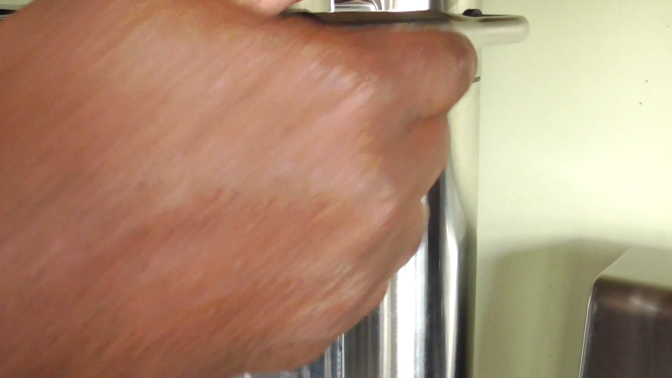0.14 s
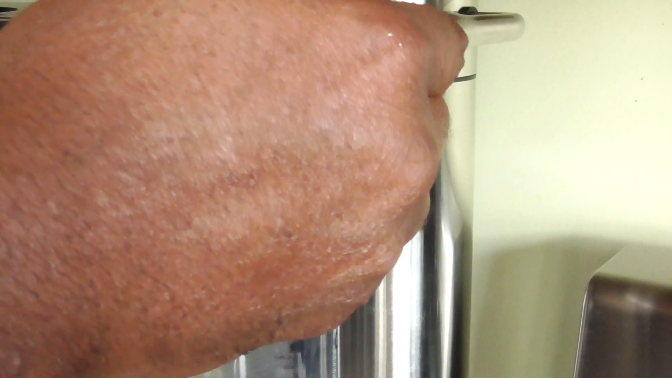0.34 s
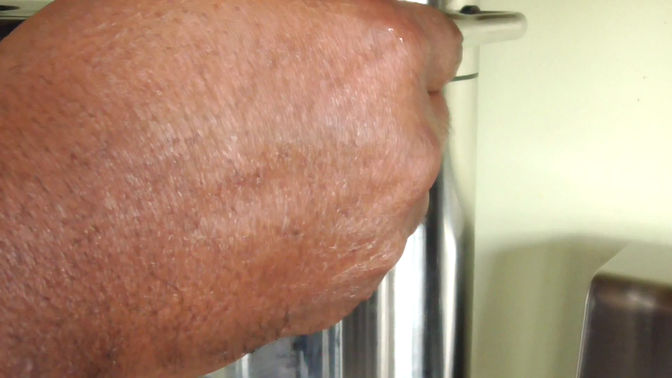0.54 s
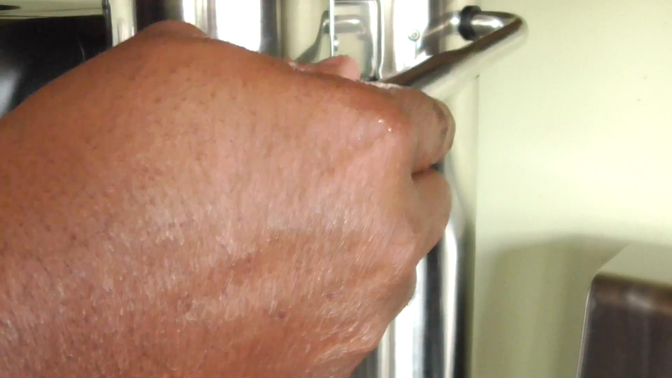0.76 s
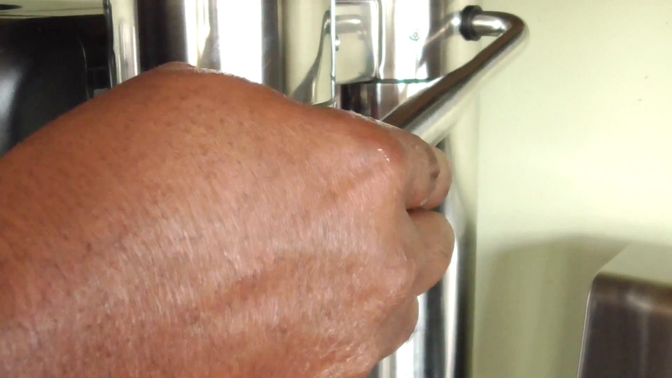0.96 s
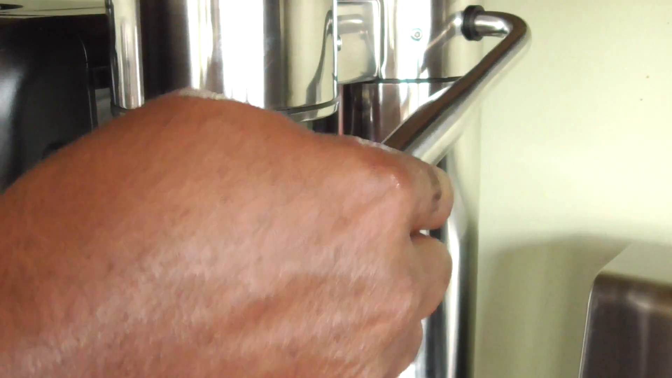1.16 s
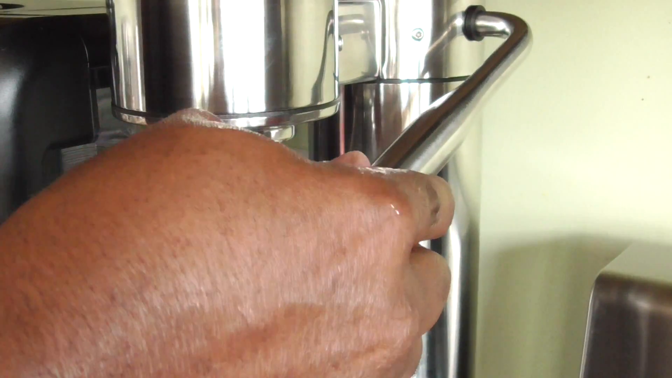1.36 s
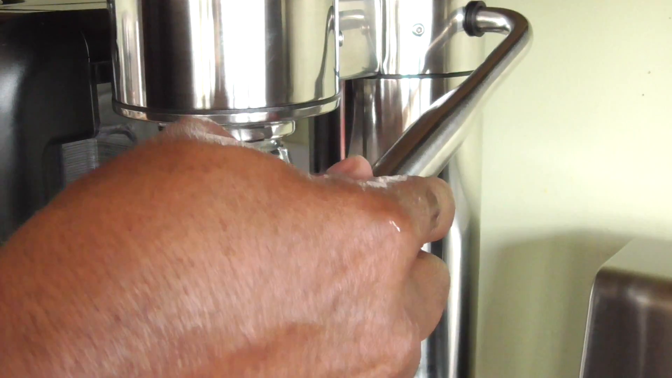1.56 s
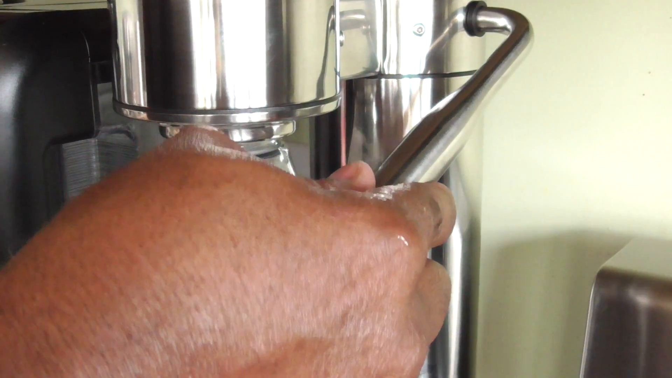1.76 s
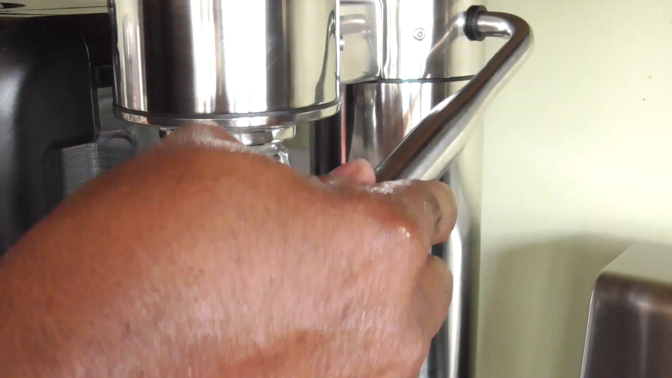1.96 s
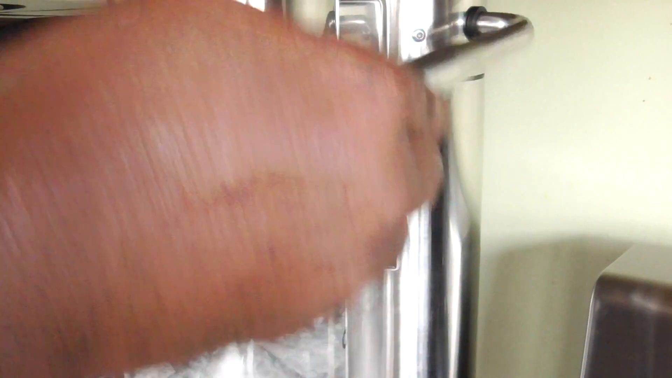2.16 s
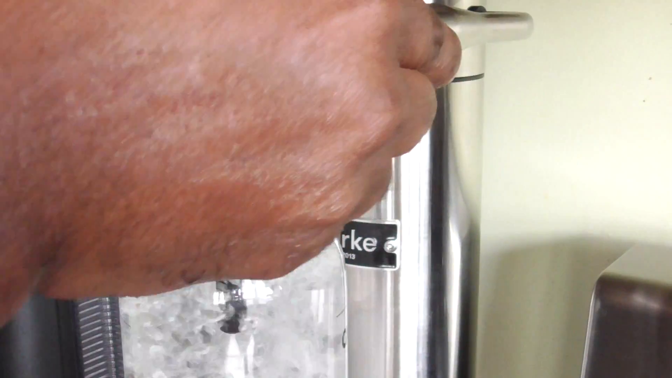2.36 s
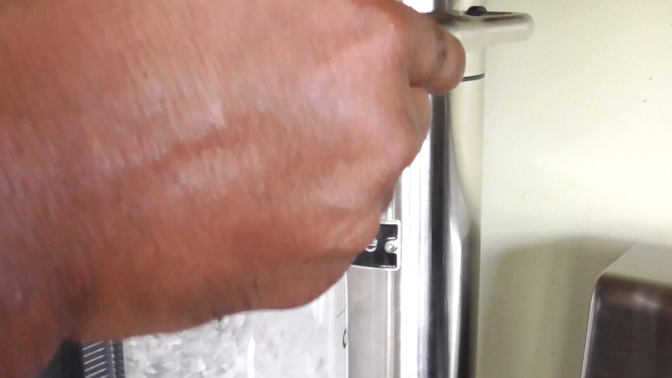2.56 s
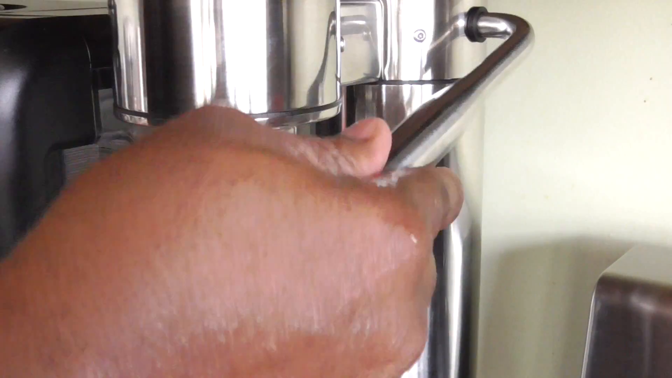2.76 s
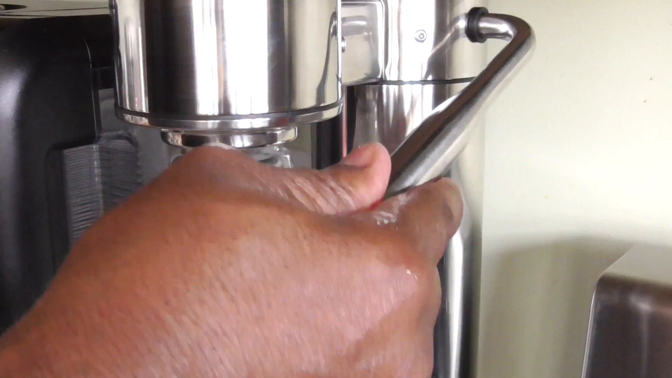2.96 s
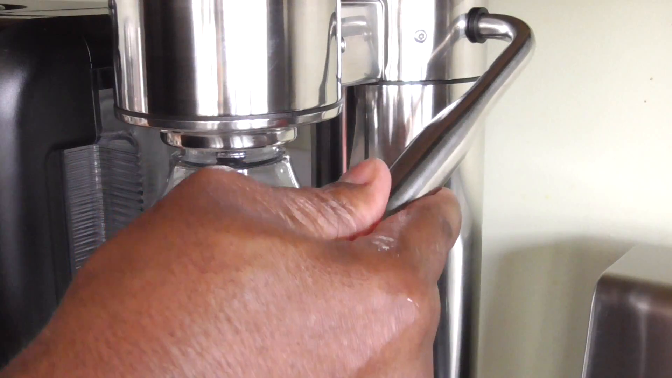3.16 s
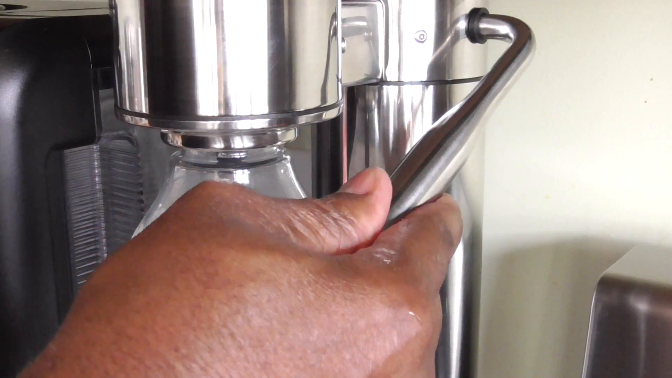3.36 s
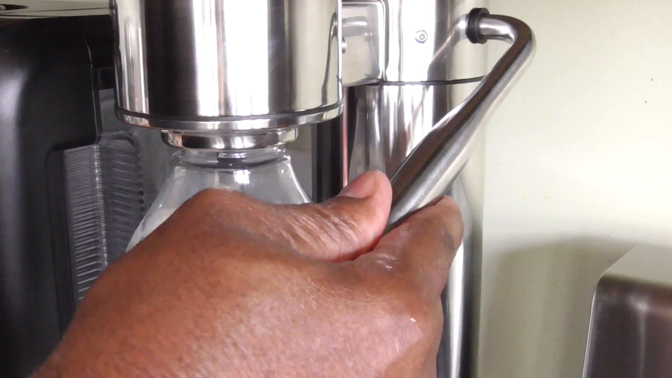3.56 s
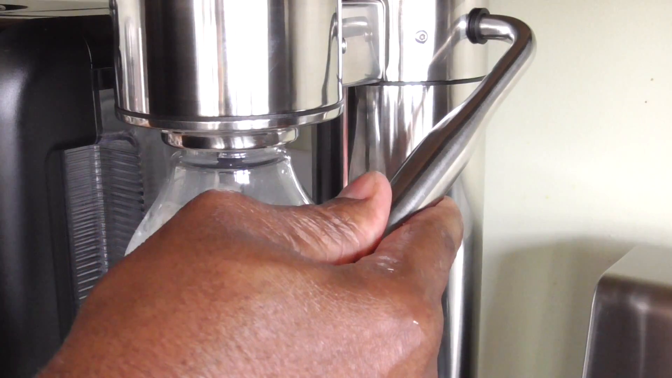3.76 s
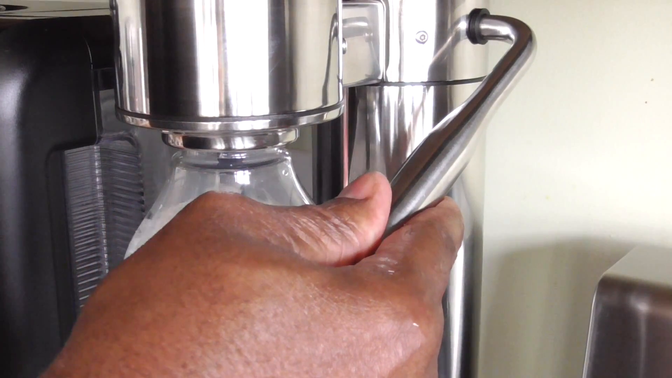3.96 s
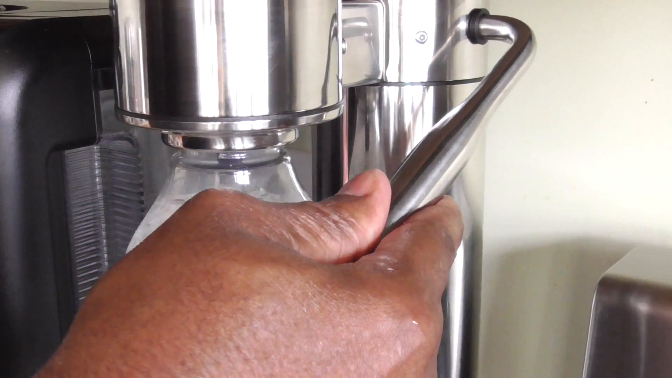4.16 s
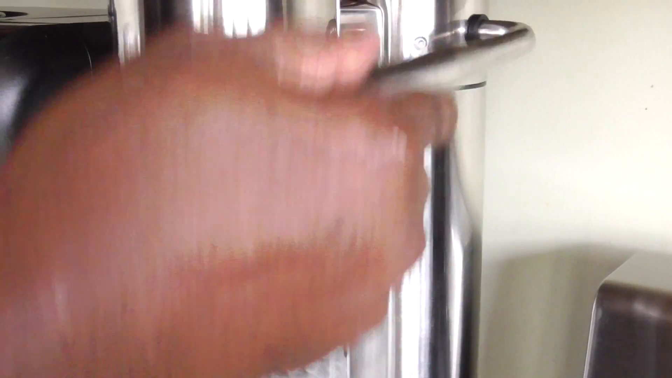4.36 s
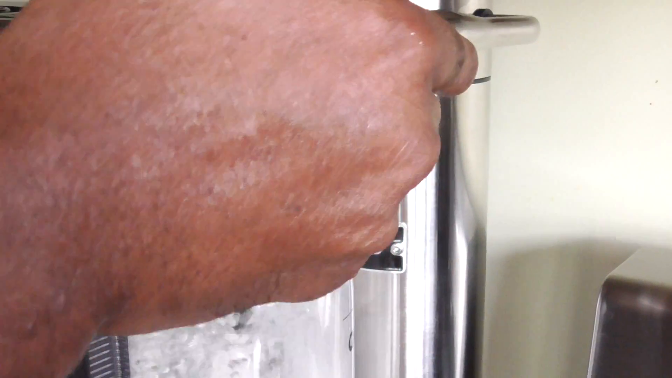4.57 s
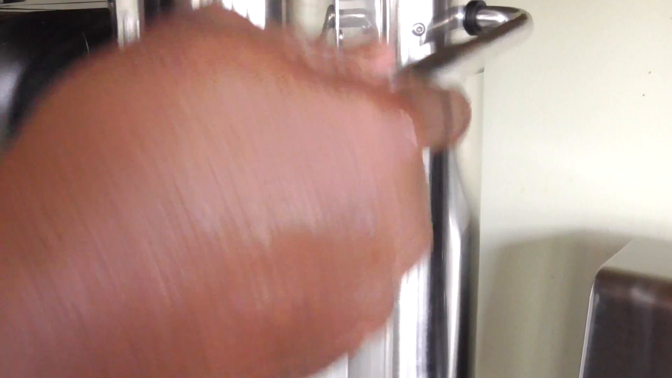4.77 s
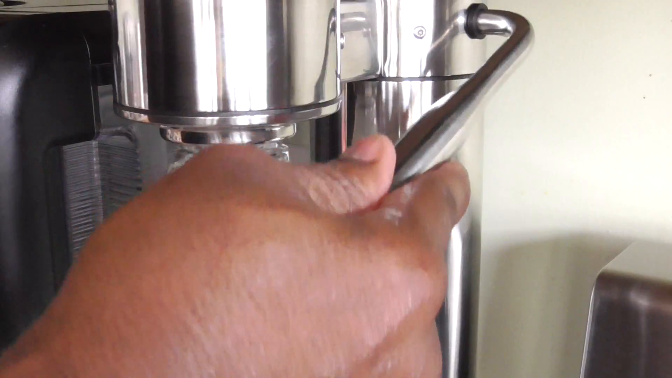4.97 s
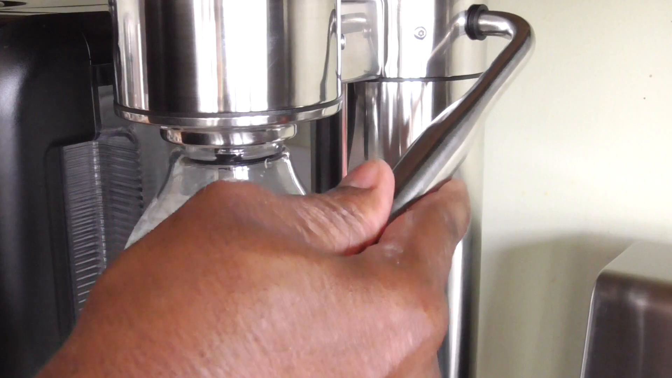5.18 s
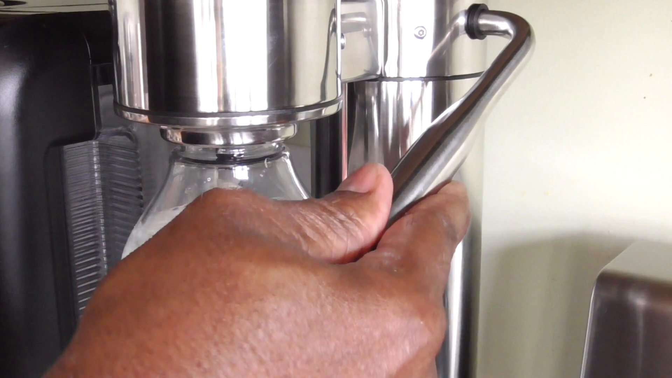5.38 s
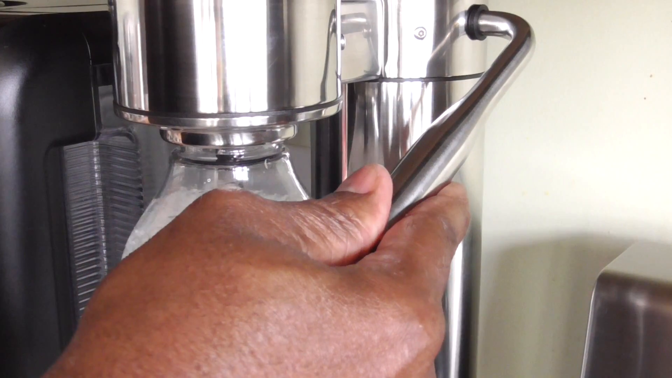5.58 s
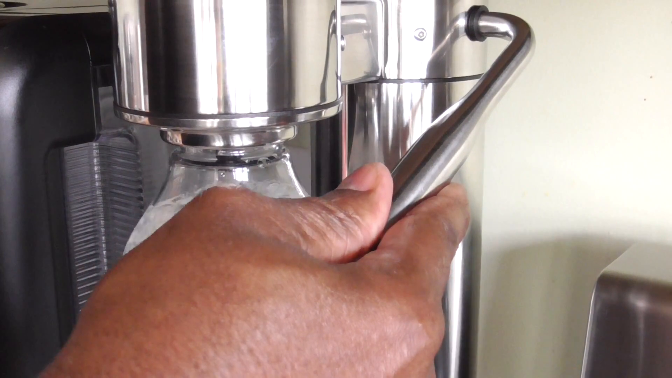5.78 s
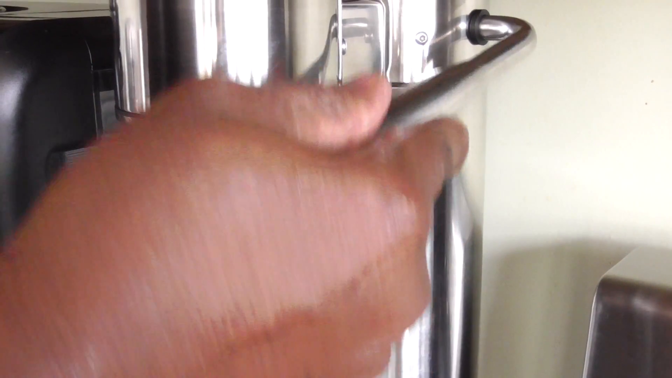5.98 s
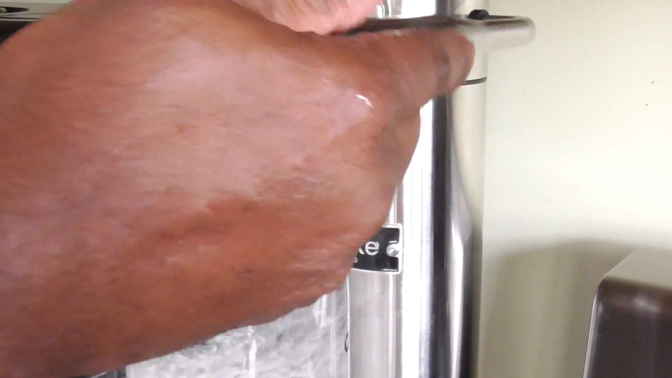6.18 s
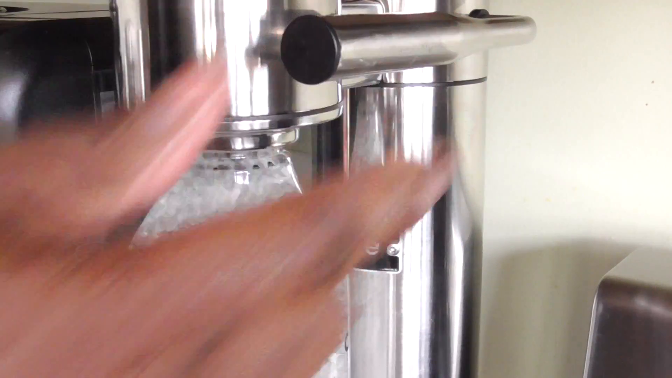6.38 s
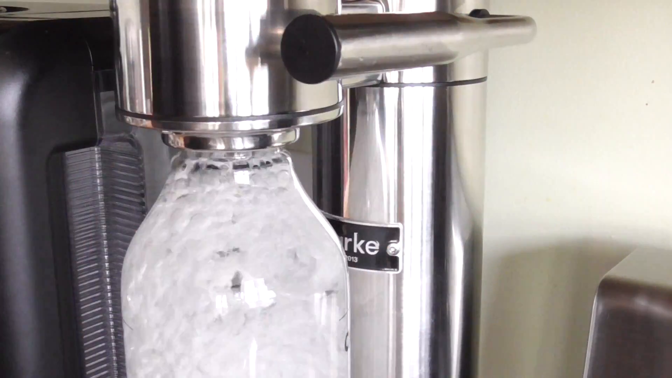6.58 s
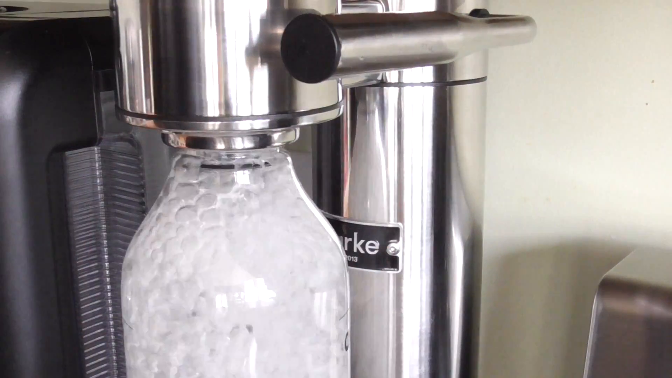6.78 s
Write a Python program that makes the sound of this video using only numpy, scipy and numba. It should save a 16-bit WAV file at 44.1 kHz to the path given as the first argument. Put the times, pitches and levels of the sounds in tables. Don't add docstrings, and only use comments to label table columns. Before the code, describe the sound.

Three bursts of pressurized gas gurgle into a bottle, squealing and rattling at a relief valve, with sharp hisses of escaping gas after each.

```python
import sys
import numpy as np
from scipy import signal
from scipy.fft import rfft, irfft, next_fast_len
from scipy.io import wavfile
from scipy.ndimage import uniform_filter1d
from numba import njit

SR = 44100
rng = np.random.default_rng(int(sys.argv[2]) if len(sys.argv) > 2 else 0)


def volts_from_db(level):
    exponent = np.asarray(level, float) / 20
    return 10 ** exponent


def generate_wav(signal):
    frames = np.transpose(np.atleast_2d(signal))
    scaled = np.clip(frames, -1, 1) * 32767
    pcm = np.round(scaled).astype(np.int16)
    wavfile.write(sys.argv[1], SR, pcm)


N = 301291
TIME = np.arange(N) / SR
FFT = next_fast_len(N)

# pitch_hz, level_db
KITCHEN = [(15, -49.5), (25, -20), (60, -16), (114, -7.5), (170, -11), (236, -5), (285, -13), (476, -10.5),
           (641, -13.5), (734, -18), (863, -13.5), (1450, -24.5), (2050, -36.5), (2280, -35.5), (5880, -42),
           (9570, -33.5), (16000, -41)]
KITCHEN_DB = -53.5
TICK_START_S, TICKS_PER_S = .0087, 59.94

# start_s, crack_db, body_hz, body_db, t60_s
KNOCKS = [(0.4843, -46, 702, -53, 0.037), (0.693, -61, 950, -56, 0.03), (0.718, -22.5, 1037, -32, 0.069),
          (0.7518, -45, 980, -31, 0.035), (1.0434, -56, 770, -41, 0.049), (1.295, -21, 807, -21, 0.068),
          (1.802, -26, 1030, -27, 0.055), (1.9243, -26, 945, -19, 0.036), (2.312, -27, 1050, -49, 0.036),
          (2.815, -60, 830, -34, 0.058), (3.046, -19, 840, -34, 0.035), (5.0384, -41, 1180, -58, 0.019),
          (5.1184, -36, 1130, -44, 0.04)]
# start_s, crack_db, body_hz, body_db, t60_s
FADING = (0, -54, 900, -80, .5)
# start_s, crack_db, body_hz, body_db, t60_s
POPS = [
    (3.9818, -3, 848, -22, .024),
    (5.3118, -7, 820, -26, .025),
]
# pitch_hz, level_db
CRACK = [(180, -63), (300, 1), (1060, 1.5), (2000, -1.5), (2980, -10), (4090, -2), (5700, -11),
         (12100, -18.5), (16000, -48)]
# start_s, end_s, start_hz,
# end_hz, level_db
SINGS = [(1.289, 1.309, 770, 740, -12.5), (1.301, 1.326, 737, 720, -20), (1.288, 1.338, 1450, 1450, -33),
         (1.52, 1.545, 590, 707, -22.5), (1.535, 1.56, 880, 830, -32), (1.558, 1.58, 850, 1170, -28),
         (1.55, 1.575, 1500, 1850, -26.5), (1.572, 1.598, 1880, 2030, -20), (1.535, 1.583, 124, 122, -29),
         (3.048, 3.074, 2900, 2910, -21), (3.072, 3.097, 2900, 2860, -20), (0.713, 0.79, 340, 350, -43),
         (1.435, 1.46, 1800, 1990, -27), (1.452, 1.495, 2050, 2000, -28), (1.3, 1.405, 730, 850, -35.5),
         (1.415, 1.45, 1100, 1400, -32), (2.7, 2.84, 340, 370, -48.5), (4.76, 4.9, 320, 340, -47),
         (2.145, 2.175, 8600, 8300, -37), (2.183, 2.2, 8500, 8300, -37), (3.086, 3.098, 8000, 7700, -29),
         (6.105, 6.145, 1820, 1810, -35.5), (1.555, 1.6, 3200, 3000, -35),
         (5.119, 5.152, 3030, 3400, -29.5), (5.146, 5.185, 3250, 2100, -32), (5.19, 5.214, 2700, 2350, -34),
         (2.205, 2.23, 3900, 3600, -26), (2.26, 2.3, 3200, 2800, -30), (2.242, 2.254, 7200, 8300, -26),
         (2.302, 2.314, 5000, 5200, -27), (2.18, 2.235, 1050, 970, -26), (1.81, 1.86, 1400, 1380, -28),
         (1.815, 1.875, 1060, 1120, -25), (2.03, 2.068, 1450, 1410, -26.5), (2.1, 2.16, 1120, 1180, -27),
         (2.125, 2.165, 1380, 1330, -26), (1.7, 2.02, 1050, 1150, -30), (5.228, 5.255, 820, 800, -37),
         (0.266, 0.28, 7800, 7200, -64)]
SING_RISE = 0.75

# time_s, flow_db, fine_against_big_bubbles_db
FILLING = [
    [(1.28, -60.5, 3), (1.29, -32.5, 0.5), (1.52, -31.5, -5), (1.534, -25.5, -6), (1.612, -33.5, 0.5),
     (1.71, -28, -11), (2.158, -29, -4.5), (2.31, -34, 12), (2.36, -48.5, -19)],
    [(3.008, -78, 0), (3.018, -50, 2), (3.054, -35, 0), (3.202, -34, -10.5), (3.418, -28.5, -1),
     (3.806, -31.5, 4), (3.98, -32.5, 8), (4.0, -48, -8)],
    [(5.032, -81, 13), (5.04, -61, 12), (5.105, -52, 8.5), (5.149, -41.5, 11), (5.305, -38.5, 7.5),
     (5.325, -51, -1)],
]
ROAR_SHARE, SEEP_DB = 0.35, -2
ROAR_HZ, ROAR_CLIMB_HZ_PER_S = (770, 924, 950), (552, 208, 0)
THIN_UNTIL_S, THIN_SHARE = 1.7, 0.41
STILL_UNTIL_S, STILL_DB = 1.4, -4.5
LIFT_HZ, LIFT_SHARE = 900, 0.52
# pitch_hz, width_hz, level_db
NECK = [(711, 56, -13), (865.4, 46, -12), (980, 43, -11), (1195, 46, -19.5), (1990, 340, -16.5)]
# pitch_hz, width_hz, level_db
WALL = [(81.6, 30, -28), (122, 23, -15.5), (208.3, 31, -25.5), (344, 29, -25)]
# pitch_hz, level_db
FIZZ = [(880, -20), (1450, -4), (1800, -5.5), (1960, -4.5), (2400, -4.5), (3300, -6), (3880, -3.5),
        (5100, -3.5), (5700, -11.5), (7500, -16), (9750, -14.5), (16500, -120)]

# peak_s, level_db, swell_s, fade_s
SPURTS = [
    (1.292, -32, 0.015, .03),
    (1.34, -29, .02, .04),
    (3.047, -19, 0.032, 0.023),
    (5.12, -29, 0.032, .03),
]
# pitch_hz, level_db
SEEP = [(5000, -6), (6500, -5), (9000, 0), (12400, -5), (13000, -19), (14500, -18), (16000, -27)]
# pitch_hz, level_db
RELIEF = [(2940, -1), (5000, -9.5), (5250, -8.5), (6350, -11), (7060, -1), (8130, -8), (10700, -6),
          (12700, -11), (13400, -15.5), (14400, -11), (15200, -21), (16000, -40)]
# pitch_hz, level_db
VENT = [(2940, 1), (5000, -6.5), (6470, -5.5), (6930, -8), (7640, -3), (8750, -2.5), (9230, -4.5),
        (9880, -9.5), (10500, -9), (11800, -1), (12200, -3), (13900, -8.5), (15000, -6), (16000, -36)]

# low_against_upper_db, then time_s, pitch_hz, upper_db
HUNTING = [
    (0, [(1.532, 2100, -26), (1.55, 1950, -29), (1.562, 1850, -36), (1.59, 1950, -35)]),
    (10, [(1.592, 2050, -37), (1.6, 2130, -31), (1.606, 2144, -34)]),
    (-0.5, [(1.603, 2370, -25), (1.612, 2436, -27.5), (1.625, 2274, -32), (1.646, 2110, -36.5)]),
    (-6, [(1.64, 2130, -34), (1.65, 2010, -29), (1.66, 1990, -32)]),
    (-20, [(1.666, 2080, -30), (1.68, 1960, -27), (1.7, 1900, -30), (1.718, 1866, -31), (1.736, 1990, -34)]),
    (-13, [(1.738, 2210, -27), (1.76, 2195, -29), (1.79, 2190, -28)]),
    (-18, [(1.795, 2116, -28), (1.81, 2075, -29), (1.824, 1990, -28)]),
]
# start_s, end_s, pitch_hz, upper_db, low_against_upper_db
HELD = [
    (1.826, 2.08, 1980, -26, -31),
    (2.088, 2.142, 2235, -34, -14),
    (3.209, 3.356, 2228, -28.5, -21),
    (3.362, 3.45, 1985, -28, -14),
    (3.45, 3.645, 2007, -31, -10.5),
    (3.642, 3.976, 1981, -24, -28),
    (4.14, 4.176, 1790, -33.5, -4),
    (5.242, 5.308, 2234, -31, -13),
    (5.561, 5.588, 1817, -36, 4.5),
    (6.105, 6.158, 1815, -28, -14),
]
# low_against_upper_db, then time_s, pitch_hz, upper_db
SWOOPS = [
    (-1, [(3.048, 2800, -31), (3.058, 2980, -34), (3.072, 2970, -39), (3.09, 2590, -27.5), (3.1, 2460, -42), (3.115, 2220, -41)]),
    (-16, [(3.118, 2190, -47), (3.13, 2250, -46), (3.148, 2473, -27.5), (3.165, 2370, -31), (3.18, 2240, -33), (3.2, 2240, -33)]),
    (-10, [(5.12, 2890, -38), (5.137, 3340, -28), (5.15, 3040, -35), (5.165, 2640, -33)]),
    (-18, [(5.168, 2620, -36), (5.185, 2360, -36), (5.21, 2454, -35), (5.225, 2300, -33), (5.238, 2260, -30)]),
]
# pitch_hz, level_db
HEAD = [(5300, -12), (5600, -12), (5950, -22), (6400, -16), (6600, -8), (6720, -2), (7300, 0), (7930, 0),
        (8050, -8), (8250, -2), (8900, 0), (9400, -9), (9900, -10), (10050, -4), (10300, -10), (11100, -14),
        (12000, -18), (13200, -28), (14000, -28)]
GLIDE_ROUGH_DB, GLIDE_ROUGH = 3, 0.011
FIRST_DB = -16

# start_s, end_s
VENTING = [
    (2.312, 3.02),
    (4.57, 5.1),
    (6.19, 8),
]
# open_s, jet_db, weaken_s, shut_s, loss_db
JETS = [
    (2.314, -24, 2.779, 2.853, 26.5),
    (4.575, -22.5, 4.742, 4.932, 18),
]
OPEN_S, SURGE_DB, SURGE_S = 0.0067, 4.5, 0.061
SHUT_DB, SHUT_S, TAIL_DB_PER_S = 19, 0.012, 170
JET_FIZZ_DB, JET_ROAR_DB, JET_ROAR_SHARE = -15.5, -48, 0.84
SURGE_HZ, SURGE_RING_DB, SURGE_RING_S, SURGE_DULL = 7840, -6, 0.18, 0.32
SETTLE_DB, SETTLE_S, SETTLE_HZ = -50.5, 0.073, 684

# start_s, let_go_s, fade_s, drone_db, sag_db_per_s
FULL = [
    (3.992, 4.578, 0.037, -32.5, -1),
    (5.314, 6.276, 0.24, -31, 3.5),
]
FULL_FIZZ_DB, RELIEF_DB, LET_GO_DB, REST_DB = 0.5, 6.5, 26, -4
# start_s, end_s, beats_per_s, puff_depth (0-1), knock_db
CHATTER = [
    (4.004, 4.129, 82, 0.71, -3),
    (4.174, 4.535, 83, 0.62, 22),
    (5.324, 5.549, 81, 0.68, -2),
    (5.599, 6.101, 72, 0.58, 14),
    (6.164, 6.284, 75, 0.4, 27.5),
]
SPIN_UP, SPIN_UP_BEATS = 0.5, 2.2
# start_s, low_hz, high_hz, against_hiss_db
WHISTLE = (5.5, 11300.5, 11800, -15)

# time_s, jet_db
EASED = [
    (6.16, -48),
    (6.24, -36),
    (6.34, -22.5),
    (6.42, -28),
    (6.53, -35.5),
    (6.59, -31.5),
    (6.68, -34),
    (6.76, -27.5),
    (6.84, -31.5),
]
FROTH_DB, FROTH_FIZZ_DB, FROTH_RUMBLE_DB = 6, 9, -52.5

# pitch_hz, level_db
WET = [(60, -18), (300, -2.5), (700, -9), (2500, -5), (5000, -5), (9000, 0.5), (16000, -2)]
# pitch_hz, level_db
LEAN = [(120, 2), (300, 0.5), (1400, -1.4), (5000, -2.5), (9000, -2.5), (14000, -7.5)]
DUCK_KNEE_DB, DUCK_SHARE, DUCK_S, RECOVER_S = -41, 0.73, 0.047, 1


def unit(x):
    return x / np.sqrt(np.mean(x ** 2))


def gate(t0, t1, fade):
    return np.clip(np.minimum(TIME - t0, t1 - TIME) / fade, 0, 1)


def curve(rows):
    s, *cols = np.transpose(rows)
    return [np.interp(TIME, s, c, left=-99, right=-99) for c in cols]


def summed(*db):
    return 10 * np.log10(sum(volts_from_db(d) ** 2 for d in db))


def colour(x, table, share=1):
    hz, db = np.transpose(table)
    f = np.maximum(np.arange(FFT // 2 + 1) * SR / FFT, 1)
    gain = volts_from_db(share * np.interp(np.log(f), np.log(hz), db))
    return irfft(rfft(x, FFT) * gain, FFT)[:len(x)]


def band(x, lo_hz, hi_hz, order=2):
    sos = signal.butter(order, [lo_hz, min(hi_hz, SR / 2.2)], "band", fs=SR, output="sos")
    return signal.sosfilt(sos, x)


def walk(rate, size=N):
    k = max(int(SR / rate), 2)
    held = np.repeat(rng.standard_normal(size // k + 1), k)
    return 0.915 * uniform_filter1d(uniform_filter1d(held, k), k)[:size]


def turbulence(patchy_db, bins):
    z = signal.stft(rng.standard_normal(N), nperseg=512)[2]
    patch = uniform_filter1d(rng.standard_normal(z.shape), bins, axis=0)
    patch = uniform_filter1d(patch, size=3, axis=1)
    return unit(signal.istft(z * volts_from_db(patchy_db * unit(patch)), nperseg=512)[1][:N])


def modes(x, table, wander_db=0):
    return sum(volts_from_db(db + wander_db * walk(12)) * unit(band(x, hz - width / 2, hz + width / 2))
               for hz, width, db in table)


@njit
def grains(n, start, hz, cycles, glide, size):
    y = np.zeros(n)
    for k in range(len(start)):
        w = 2 * np.pi * hz[k] / SR
        r = np.exp(-hz[k] / SR / cycles[k])
        a, ph = size[k], 0.
        for i in range(start[k], min(n, start[k] + int(5 * cycles[k] * SR / hz[k]))):
            y[i] += a * np.sin(ph)
            ph += w
            w *= 1 + glide * hz[k] / SR
            a *= r
    return y


def kitchen():
    mid, side = (colour(turbulence(1.2, 3), KITCHEN) for _ in range(2))
    air = unit(unit(mid) + .5 * unit(side) * np.array([[1], [-1]]))
    hum = volts_from_db(-8 + 1.2 * walk(6.6)) * np.sin(2 * np.pi * 120 * TIME)
    hum += volts_from_db(-4.0 + 1.5 * walk(9.2)) * np.sin(2 * np.pi * 238 * TIME)
    at = np.arange(TICK_START_S, N / SR - .02, 1 / TICKS_PER_S)
    c = rng.standard_normal((len(at), 2)).T
    start, cycles = (at * SR).astype(np.int64), np.full(len(at), 4.)
    strong = np.arange(len(at)) % 2 == 0
    ticks = grains(N, start, 2400 * volts_from_db(.4 * c[1]), cycles, 0., volts_from_db(-7.0 + 2.5 * c[0]))
    ticks += grains(N, start, 3750 * volts_from_db(.2 * c[0]), cycles, 0., volts_from_db(-16.5 + 8.0 * strong + 2.3 * c[1]))
    return (air + hum + ticks) * volts_from_db(KITCHEN_DB)


def knocks():
    out, t = np.zeros(N), TIME[:SR // 4]
    white = rng.standard_normal(N)
    dull, bright = unit(colour(white, CRACK)), unit(band(white, 3300, 13000))
    noise = np.where(TIME < VENTING[0][0] - .01, dull, bright)
    for s, crack_db, hz, body_db, t60 in KNOCKS + POPS + [FADING]:
        cut = slice(int(s * SR), int(s * SR) + len(t))
        crack = .6 * volts_from_db(crack_db) * noise[cut] * np.minimum(t / .0007, 1)
        body = volts_from_db(body_db) * np.sin(2 * np.pi * hz * t)
        out[cut] += volts_from_db(-60 * t / t60) * (crack + body)
    return out


def sings():
    out = np.zeros(N)
    for t0, t1, hz, end_hz, db in SINGS:
        along = np.clip((TIME - t0) / (t1 - t0), 0, 1)
        swell = np.sin(np.pi * along ** SING_RISE)
        pitch = (hz + (end_hz - hz) * along) * (1 + .012 * walk(120))
        out += volts_from_db(db + 2.5 * walk(90)) * swell * np.sin(2 * np.pi * np.cumsum(pitch) / SR)
    return out


def flows():
    roar, fizz, seep, hz = [], [], [], np.zeros(N)
    for rows, start_hz, climb in zip(FILLING, ROAR_HZ, ROAR_CLIMB_HZ_PER_S):
        flow, fine = curve(rows)
        fine = np.where(flow > -99, fine, 0)
        roar.append(flow - ROAR_SHARE * fine)
        fizz.append(flow + (1 - ROAR_SHARE) * fine)
        seep.append(flow)
        since = TIME - rows[0][0]
        hz = np.where(since > 0, start_hz + climb * np.minimum(since, 0.7), hz)
    t0, t1 = VENTING[0]
    hz[(TIME > t0 + .35) & (TIME < t1 - .02)] = SETTLE_HZ
    drones = []
    for t0, t1, fade, db, sag in FULL:
        drones += curve([(t0, db), (t1, db - sag * (t1 - t0)), (t1 + fade, db - LET_GO_DB), (t1 + 2 * fade, -99)])
    drone = summed(*drones)
    jets = []
    for t0, db, t1, t2, loss in JETS:
        shut_db = db - loss - SHUT_DB
        jet, = curve([(t0 - OPEN_S, db - 30), (t0, db), (t1, db), (t2, db - loss), (t2 + SHUT_S, shut_db),
                      (t2 + 1, shut_db - TAIL_DB_PER_S)])
        jets.append(jet + (t0 < FULL[0][0]) * SURGE_DB * np.exp(-np.abs(TIME - t0) / SURGE_S))
    jet = summed(*jets, *curve(EASED))
    froth = gate(FULL[1][1], N, FULL[1][2])
    spurts = [curve([(s - swell, db - 32), (s, db), (s + fade, db - 19)])[0] for s, db, swell, fade in SPURTS]
    stirred = JET_ROAR_DB + JET_ROAR_SHARE * (jet - JETS[0][1]) + FROTH_DB * froth - 60 * (jet < -90)
    settle = sum(gate(r[2] - SETTLE_S, r[3] + 0.049, 0.047) for r in JETS)
    settle = SETTLE_DB + 20 * np.log10(settle + 1e-3)
    shaken_db = summed(*roar, drone, settle, stirred - 30 * (1 - froth))
    roar_db = summed(shaken_db, stirred)
    fizz_db = summed(*fizz, drone + FULL_FIZZ_DB, jet + JET_FIZZ_DB + FROTH_FIZZ_DB * froth)
    seep_db = summed(summed(*seep, drone) + SEEP_DB, *spurts)
    return roar_db, shaken_db, hz, fizz_db, seep_db, drone + RELIEF_DB, jet


def bubbles(rate, hz, octaves, cycles, spread_db):
    c = rng.random((int(rate * N / SR), 4)).T
    start = (c[0] * (N - 1)).astype(np.int64)
    pitch = hz[start] * 2 ** (octaves * (c[1] + c[2] - 1))
    size = volts_from_db(-spread_db * np.log(c[3] + 1e-6))
    return unit(grains(N, start, pitch, np.full(len(start), cycles), 0.00638, size))


def water_roar(puff, knock, hz, full, rest):
    cloud = bubbles(350, np.clip(hz * volts_from_db(1.13 * walk(14)), 600, 1600), 0.58, 6.7, 2.24)
    stir = rng.standard_normal(N)
    column = modes(stir, NECK, wander_db=3.0)
    gurgle = cloud + 0.77 * column * volts_from_db(3.5 * walk(25.13))
    gurgle = unit(gurgle + 0.55 * unit(band(stir, 830, 1930)) + 0.2 * unit(band(stir, 500, 680)))
    lift = np.clip(LIFT_SHARE * (hz - LIFT_HZ) / 150, 0, LIFT_SHARE)
    gurgle -= lift * band(gurgle, 716, 900, order=1)
    drone = (column + 1.03 * unit(band(stir, 594, 1020, order=3))) * (.5 + .5 * puff)
    drone += 9 * band(knock, 654, 780)
    return band((1 - full) * gurgle + full * drone * volts_from_db(-11 * rest), 440, 8300, order=3)


def wall_boom(shaken_db, full):
    shake = rng.standard_normal(N)
    wall = modes(shake, WALL, wander_db=2.5) + full * volts_from_db(-16) * unit(band(shake, 253, 378))
    boom = wall * volts_from_db(0.79 * (uniform_filter1d(shaken_db, 2000) + 30.5) - 30.5)
    rumble = volts_from_db(FROTH_RUMBLE_DB + 2.7 * walk(5.6)) * gate(EASED[3][0], N, 0.13)
    return boom + rumble * unit(band(shake, 123, 440))


def fine_fizz(full):
    hiss = unit(colour(turbulence(2.94, 4), FIZZ))
    swarm = band(bubbles(400, np.full(N, 3300.), 1.0, 9.1, 2.4), 1230, 9300)
    pings = bubbles(70, 3600 * volts_from_db(2 * walk(6)), .7, 18., 2.1)
    fizz = unit(hiss + 0.26 * swarm + (0.28 - 0.18 * np.clip(full, 0, 1)) * pings)
    thin = THIN_SHARE * gate(0, THIN_UNTIL_S, 0.036)
    return (fizz - thin * band(fizz, 1900, 5200, order=1)) * volts_from_db(2.4 * walk(18))


def bottle(puff, knock, roar_db, shaken_db, hz, fizz_db):
    full = gate(CHATTER[0][0] - .015, VENTING[1][0] + 0.036, 0.0063) + gate(CHATTER[2][0], N, 0.0019)
    beating = np.clip(sum(gate(r[0] - .012, r[1] + 0.014, 0.006) for r in CHATTER), 0, 1)
    chattering = gate(CHATTER[0][0], CHATTER[1][1], .005) + gate(CHATTER[2][0], CHATTER[4][1], .005)
    rest = np.clip(chattering - beating, 0, 1)
    roar = water_roar(puff, knock, hz, full, rest) * volts_from_db(roar_db + STILL_DB * gate(0, STILL_UNTIL_S, .015))
    fizz = fine_fizz(full) * volts_from_db(fizz_db + REST_DB * rest) * (.5 + .5 * puff)
    return roar + wall_boom(shaken_db, full) + fizz


def gas(puff, seep_db, relief_db, jet_db):
    jet = turbulence(1.17, 6) * volts_from_db(0.63 * walk(60))
    seep_jet, relief_jet, vent_jet = (unit(band(colour(jet, c), 4610, 22000, order=4))
                                      for c in (SEEP, RELIEF, VENT))
    relief = np.clip(sum(gate(r[0] - .022, r[1] + 0.042, 0.0016) for r in CHATTER), 0, 1)
    relief *= .55 + .45 * np.clip(sum(gate(r[0] - .015, r[1] + .015, .008) for r in CHATTER), 0, 1)
    surge = np.exp(-np.abs(TIME - JETS[0][0]) / SURGE_RING_S)
    vent_jet = vent_jet - SURGE_DULL * surge * band(vent_jet, 13000, 20000, order=1)
    vent_jet += volts_from_db(SURGE_RING_DB) * surge * unit(band(jet, SURGE_HZ - 450, SURGE_HZ + 450))
    wet = 0.12 * gate(EASED[2][0], N, 0.24)
    vent_jet = (1 - wet) * vent_jet + wet * relief_jet
    t0, lo_hz, hi_hz, db = WHISTLE
    whistle = unit(band(jet, lo_hz, hi_hz)) * volts_from_db(db + summed(relief_db, jet_db)) * gate(t0, N, .01)
    hiss = volts_from_db(seep_db - 6.5) * seep_jet + relief * volts_from_db(relief_db) * relief_jet + volts_from_db(jet_db) * vent_jet
    return hiss * puff + whistle


def squeal():
    out, unsteady = np.zeros(N), walk(150)
    head_hz, head_db = np.transpose(HEAD)
    held = [(low_db, [(t0, hz, db), (t1, hz, db)]) for t0, t1, hz, db, low_db in HELD]
    for low_db, run in held + HUNTING + SWOOPS:
        s, *cols = np.transpose(run)
        cut = slice(int(s[0] * SR), int((s[-1] + .006) * SR))
        hz, upper_db = (uniform_filter1d(np.interp(TIME[cut], s, c), size=300) for c in cols)
        glide = len(run) > 2
        jitter = 1 + (0.0033 + glide * GLIDE_ROUGH) * unsteady[cut]
        phase = 2 * np.pi * np.cumsum(hz * jitter) / SR
        wander = np.array([walk(83.4, size=len(hz)) for _ in range(7)])
        flicker = volts_from_db((1.0 + glide * GLIDE_ROUGH_DB) * wander)
        k = np.arange(3, 8)[:, None]
        gain = volts_from_db(np.interp(k * hz, head_hz, head_db, right=-60))
        upper = np.sum(gain * flicker[2:] * np.sin(k * phase), axis=0) / np.sqrt(np.sum(gain ** 2, axis=0))
        low = flicker[1] * np.sin(2 * phase) + volts_from_db(FIRST_DB) * flicker[0] * np.sin(phase)
        stack = volts_from_db(upper_db) * upper + volts_from_db(upper_db + low_db) * low
        swell = gate(s[0] - .002, s[-1] + .006, .004)[cut] * volts_from_db(2.2 * unsteady[::-1][cut])
        out[cut] += np.sqrt(2) * stack * swell
    return out


def relief_beats():
    puff, knock = np.ones(N), np.zeros(N)
    for t0, t1, rate, depth, db in CHATTER:
        c = rng.standard_normal((60, 2)).T
        slow = (t0 == CHATTER[0][0]) * SPIN_UP * np.exp(-np.arange(60) / SPIN_UP_BEATS)
        gaps = (1 + 0.04 * c[0] + slow) / rate
        at = t0 + np.cumsum(gaps) - gaps
        hit = np.zeros(N)
        hit[(at[at < t1] * SR).astype(int)] = volts_from_db(1.9 * c[1][at < t1])
        burst = signal.lfilter([1], [1, -np.exp(-1 / (0.0021 * SR))], hit)
        on = gate(t0, t1, .002) > 0
        puff[on] = unit(1 - depth + 1.13 * depth * burst[on])
        knock += hit * volts_from_db(db)
    return puff, knock


def room_tail():
    t = TIME[:SR // 2]
    early = rng.standard_normal((2, len(t))) * volts_from_db(-60 * t / 0.049)
    late = band(rng.standard_normal(early.shape), 100, 5200, order=1) * volts_from_db(-13.5 - 60 * t / 0.43)
    tail = (early + late) * (t > .0006)
    return tail / np.sqrt(np.sum(tail ** 2, axis=1, keepdims=True))


def ducking(level_db):
    over_db = np.maximum(level_db - DUCK_KNEE_DB, 0)
    keeps = np.exp(-1 / (np.array([DUCK_S, RECOVER_S]) * SR))
    loud_db = np.max([signal.lfilter([1 - k], [1, -k], over_db) for k in keeps], axis=0)
    return volts_from_db(-DUCK_SHARE * loud_db)


def scene():
    puff, knock = relief_beats()
    roar_db, shaken_db, hz, fizz_db, seep_db, relief_db, jet_db = flows()
    spread = bottle(puff, knock, roar_db, shaken_db, hz, fizz_db) + gas(puff, seep_db, relief_db, jet_db)
    aimed, hits = squeal(), knocks() + sings()
    direct = spread + aimed + hits
    wet = colour(spread + volts_from_db(-1.0) * aimed + volts_from_db(-3.0) * hits, WET)
    ears = []
    for ir, side in zip(room_tail(), (1, -1)):
        heard = direct + signal.fftconvolve(wet, ir)[:N]
        ears.append(volts_from_db(-1.5) * colour(heard, LEAN, side / 2))
    return np.array(ears) + kitchen() * ducking(summed(roar_db, fizz_db, jet_db))


def roll_off(x):
    return signal.sosfilt(signal.butter(12, 16460, fs=SR, output="sos"), x)


def record(dry):
    top = signal.ellip(10, .2, 70, 15900, fs=SR, output="sos")
    low_cut = signal.butter(2, 55, "high", fs=SR, output="sos")
    mix = signal.sosfilt(np.vstack([top, low_cut]), dry)
    return roll_off(mix)


dry = scene()
out = record(dry)
generate_wav(out)
```